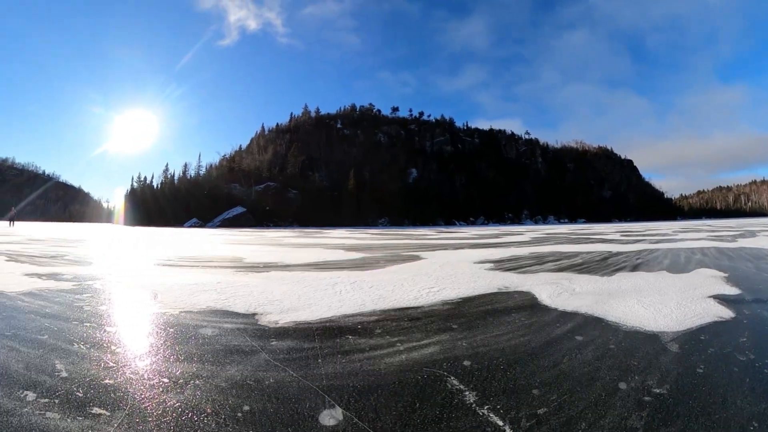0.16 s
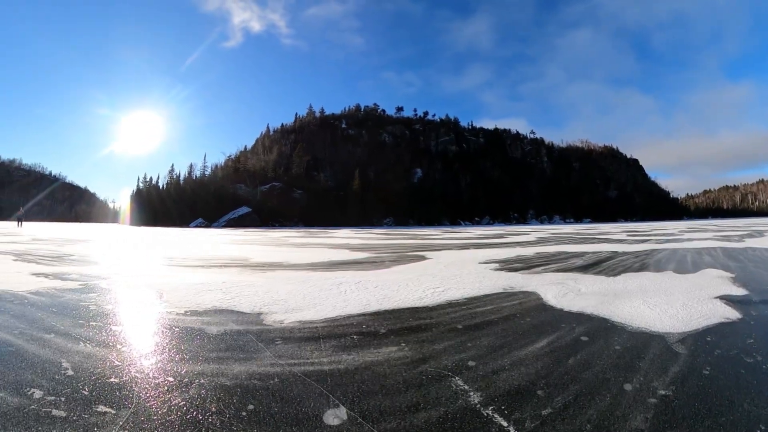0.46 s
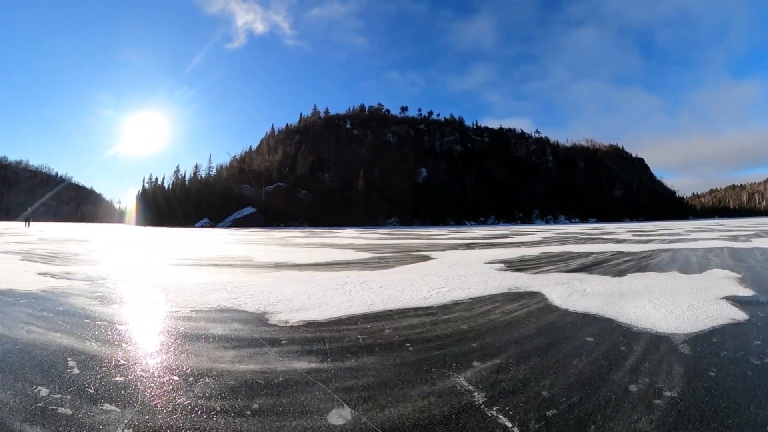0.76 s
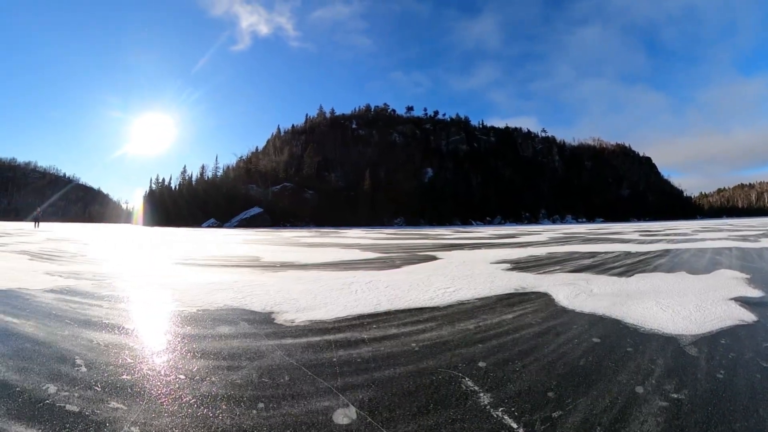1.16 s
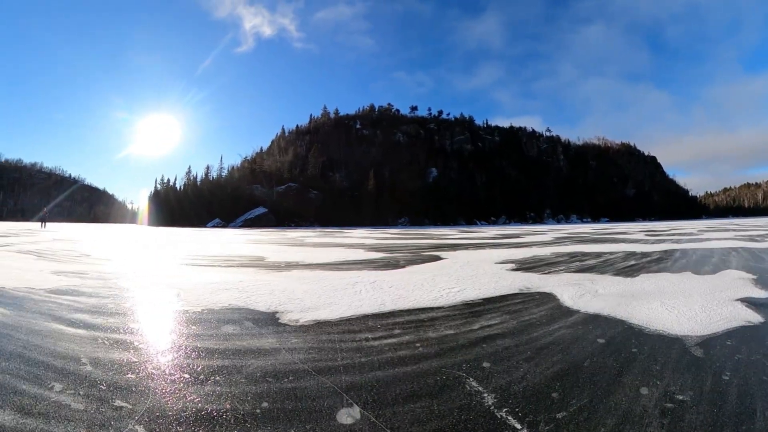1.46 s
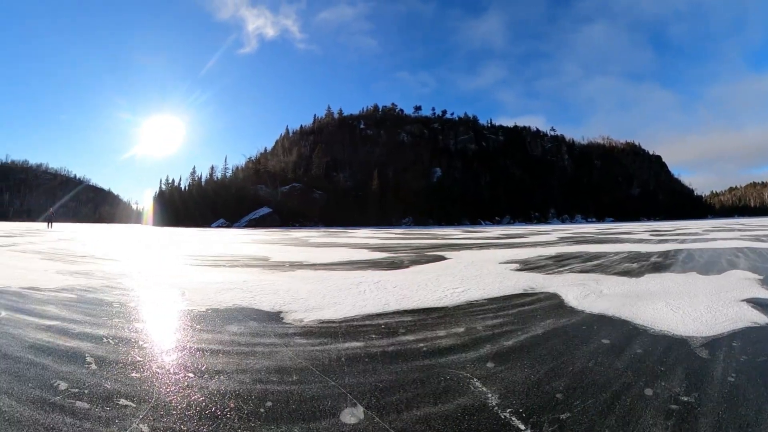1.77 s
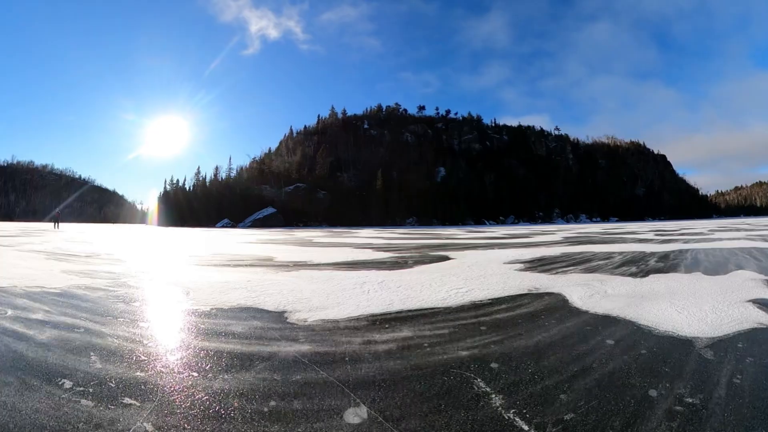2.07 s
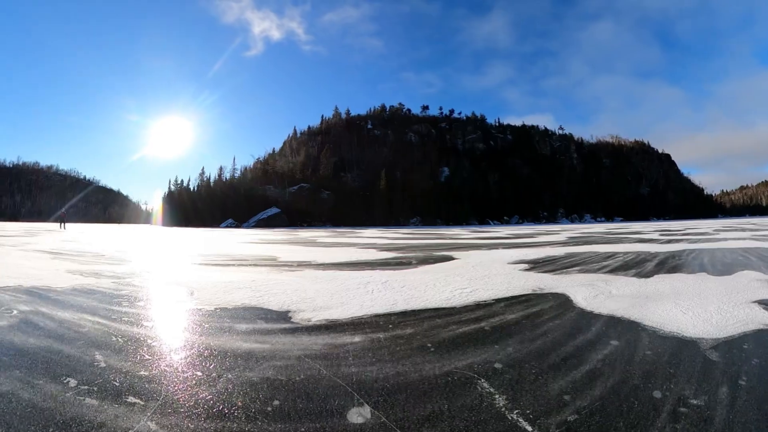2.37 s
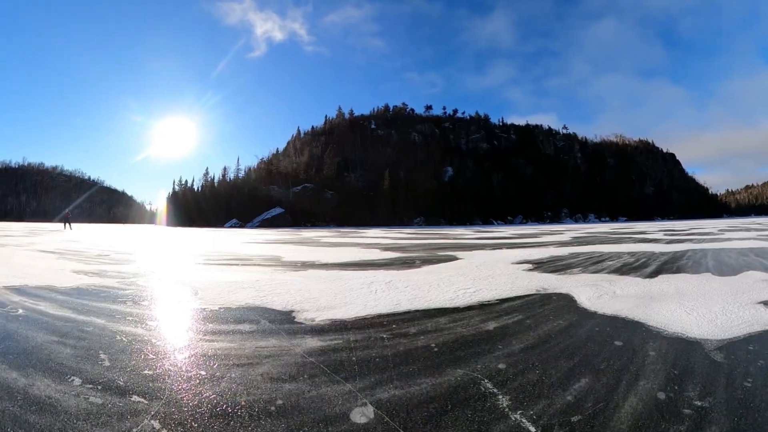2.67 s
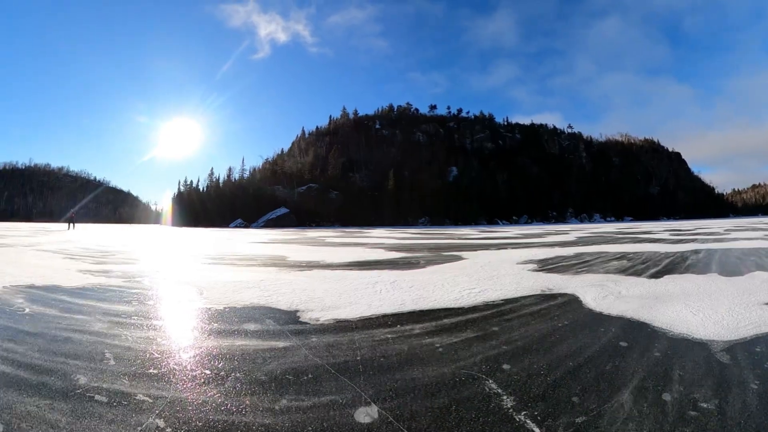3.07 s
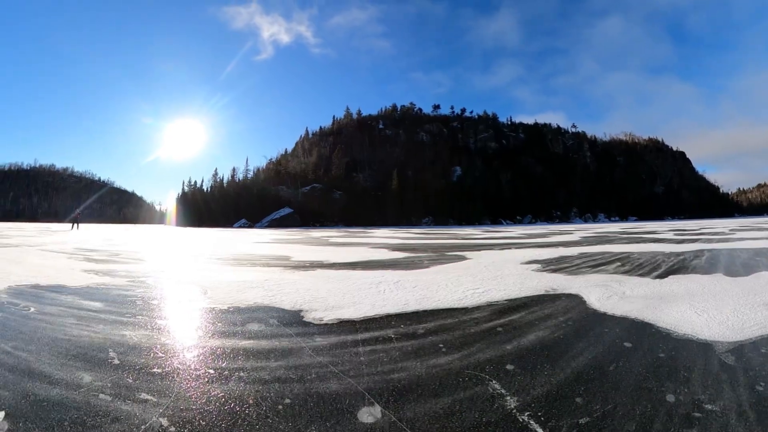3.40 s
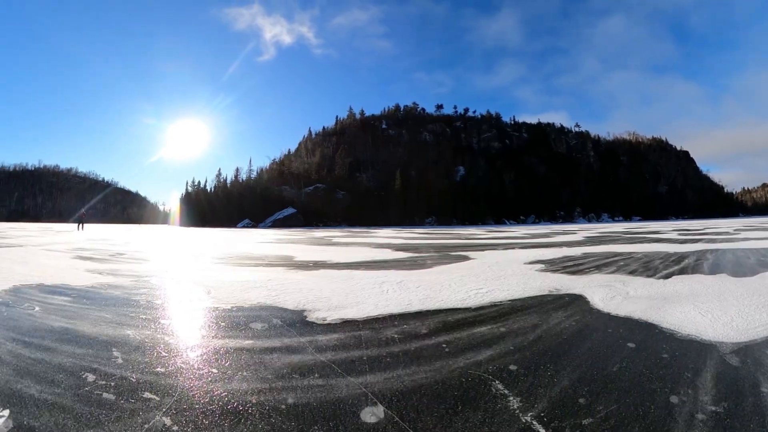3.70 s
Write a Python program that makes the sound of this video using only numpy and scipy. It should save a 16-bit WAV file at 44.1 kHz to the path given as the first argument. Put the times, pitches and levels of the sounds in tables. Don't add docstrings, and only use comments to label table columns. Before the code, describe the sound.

Wind buffeting a small exposed camera microphone on a frozen lake: continuous lumpy low rumble, dense crackling rips in the first two seconds, a thinner lull, then renewed gusts and snaps near the end.

```python
import sys
import numpy as np
from scipy import signal
from scipy.fft import rfft, irfft, next_fast_len
from scipy.io import wavfile
from scipy.ndimage import uniform_filter1d

SR = 44100
rng = np.random.default_rng(int(sys.argv[2]) if len(sys.argv) > 2 else 0)


def log_audio(samples):
    frames = np.atleast_2d(samples).T
    limited = np.clip(frames, -1, 1)
    pcm = np.round(limited * 32767).astype(np.int16)
    wavfile.write(sys.argv[1], SR, pcm)


def magnitude_from_level(level_db):
    exponent = np.asarray(level_db, float) / 20
    return 10 ** exponent


N = 169344

# start_s, level_db
PRESSURE = [(0, -26.5), (.2, -32.5), (0.369, -27), (.55, -23.5), (0.721, -28), (0.882, -35), (0.929, -30),
            (1.4, -24.5), (1.701, -27), (2.001, -28), (2.3, -36), (2.55, -30.5), (2.609, -30),
            (2.741, -35.5), (2.849, -29.5), (3.08, -35.5), (3.25, -26), (3.84, -30)]
# frequency_hz, density_db (per Hz)
RUMBLE_SPECTRUM = [(5.9, -34), (10, 5.5), (44, 2.5), (108, -1.5), (200, -20), (250, -31), (451, -46.5),
                   (1300, -64.5), (1690, -83.5), (2860, -120)]
# start_s, level_db
WIND_SPEED = [(0, -49.5), (.3, -54.5), (.47, -43), (.62, -48), (.76, -42.5), (.92, -53.5), (.97, -43),
              (1.36, -52.5), (1.43, -40), (1.5, -51), (1.88, -46), (2.08, -48), (2.12, -55.5),
              (2.66, -55.5), (3.05, -50.5), (3.37, -49), (3.52, -42), (3.84, -44)]
# frequency_hz, density_db (per Hz)
TEAR_SPECTRUM = [(1450, 5.5), (2000, -4), (3000, -18.5), (4200, -34), (6000, -50.5), (7800, -55.5),
                 (9500, -82)]
# centre_s, length_s, depth_db
LULLS = [(0.068, 0.034, -7), (0.178, 0.013, -21), (0.26, 0.013, -13), (0.383, 0.015, -19),
         (0.55, 0.017, -3.5), (1.183, 0.011, -19.5), (1.422, 0.006, -7), (1.453, 0.0095, -20),
         (1.529, 0.014, -14.5), (1.657, 0.01, -16), (1.712, 0.017, -13.5), (2.47, 0.072, -41),
         (2.749, 0.034, -15), (2.946, .02, -12.5), (3.163, .022, -15.5), (3.349, 0.022, -11),
         (3.592, 0.02, -9.5), (3.781, 0.0052, 0.5), (2.87, .008, -7.5)]
# frequency_hz, density_db (per Hz)
HISS_SPECTRUM = [(800, 1), (1500, -1), (4000, -1), (5500, -0.5), (7200, 2), (7800, -4), (8800, -20),
                 (12000, -20.5)]
# centre_s, peak_db, length_s, brightness_db (per octave)
WHIPS = [(0.0117, -34, 0.0015, -11.5), (0.112, -37, 0.0019, -15.5), (0.139, -41, 0.0014, -4),
         (0.298, -32, 0.0012, -9), (0.3092, -38, 0.0015, -0.5), (0.3398, -44, 0.0014, 7),
         (0.3488, -34.5, 0.004, -4.5), (0.4214, -47.5, 0.004, -20.5), (0.4545, -30, 0.0026, -1),
         (0.4656, -37, 0.0011, 12.5), (0.4848, -33, 0.0014, 10), (0.4896, -37.5, 0.0019, 12.5),
         (0.4978, -27, 0.002, 9), (0.531, -39, 0.0015, 0.5), (0.568, -25.5, 0.0015, 5),
         (0.577, -34.5, 0.0021, 2.5), (0.6464, -31, 0.0026, -10.5), (0.681, -27, 0.0015, -1.5),
         (0.7006, -38, 0.0016, -8), (0.7055, -26, 0.0012, -6), (0.732, -24.5, 0.0012, -2.5),
         (0.7496, -30.5, 0.0028, -2.5), (0.774, -36, 0.0019, -2), (0.783, -27, 0.0015, -4),
         (0.8117, -29, 0.0015, -3), (0.8601, -40.5, 0.002, -4.5), (0.8689, -39, 0.002, -6),
         (0.879, -34.5, 0.0012, 3.5), (0.899, -47.5, 0.0039, 5.5), (0.912, -42.0, 0.0013, -5),
         (0.9336, -43, 0.0021, -9), (0.9536, -28, 0.0013, 4), (0.9906, -31, 0.0015, 3.5),
         (1.024, -36.5, 0.0018, 2.5), (1.065, -40, 0.0026, 1), (1.1005, -33.5, 0.0025, -7),
         (1.1114, -39.5, 0.0019, -8), (1.155, -31.5, 0.0028, -3.5), (1.193, -35, 0.0019, -3.5),
         (1.208, -37, 0.0045, -2.5), (1.2538, -28.5, 0.0015, 1.5), (1.2905, -33.5, 0.0027, -15),
         (1.3071, -27.5, 0.0012, 2), (1.3157, -30.5, 0.002, 1), (1.336, -38, 0.0017, 2.5),
         (1.3498, -29, 0.0026, 2.5), (1.3755, -33.5, 0.0014, -10), (1.3932, -27.5, 0.002, 10),
              (1.407, -30.5, 0.0031, 14), (1.4642, -41, 0.0017, 11), (1.4832, -34.5, 0.0012, 10.5),
              (1.5, -38.5, 0.0016, -2.5), (1.5625, -39, 0.0026, 6), (1.5899, -32.5, 0.0018, 3.5),
              (1.609, -36.5, 0.0017, -1.5), (1.6283, -34.5, 0.0034, 5), (1.6454, -43.5, 0.0013, 5),
              (1.6834, -46, 0.0032, 0.5), (1.7363, -43.5, 0.0032, 4), (1.752, -52, 0.0036, -5.5),
              (1.77, -34.0, 0.002, 2), (1.8457, -37.5, 0.0047, -0.5), (1.873, -34.5, 0.0021, 7.5),
              (1.9292, -37.5, 0.002, 7.5), (1.9761, -44, 0.0026, 1.5), (2.012, -32.5, 0.0014, -0.5),
              (2.022, -45.5, 0.003, 14.5), (2.064, -34.5, 0.002, 0.5), (2.0772, -36, 0.003, 4.5),
              (2.3303, -37.5, 0.0016, -10.5), (2.3482, -39.5, 0.0014, -0.5), (2.639, -41.5, 0.0012, 1),
              (2.6504, -37.5, 0.0013, 6.5), (2.6727, -39, 0.0016, 0), (2.693, -39.5, 0.0013, -1),
              (2.8218, -35.5, 0.0015, -3.5), (2.8384, -42, 0.0013, 4), (2.9862, -35, 0.0018, 9),
              (3.1972, -41.5, 0.0018, -5), (3.408, -32.5, 0.0016, 8), (3.4723, -42.5, 0.0021, -4.5),
              (3.4995, -37.5, 0.0025, 5), (3.511, -38.5, 0.0024, 8.5), (3.5377, -26.5, 0.0012, 9),
              (3.5485, -36.5, 0.0024, 13), (3.6326, -40.5, 0.0016, 3.5), (3.6614, -29.5, 0.0019, -4),
              (3.7237, -35.5, 0.0022, -5), (3.743, -31.5, 0.0015, 15), (3.798, -25.5, 0.0012, 3.5)]
# centre_s, peak_db, length_s, swing_hz
SURGES = [(0.028, -18.5, 0.024, 30.3), (0.348, -24, 0.047, 44), (.51, -19.5, 0.026, 34.3),
          (0.601, -25, 0.023, 88), (.96, -26.5, 0.02, 68.2), (1.2, -26.5, .035, 68.5),
          (1.34, -23.5, 0.031, 108.7), (1.407, -22.5, .035, 56), (1.549, -24, 0.037, 64),
          (1.63, -26.5, 0.035, 99.6), (1.8, -20, 0.021, 46), (1.94, -26, 0.058, 55),
          (2.098, -29.5, 0.048, 89.3), (2.611, -24, 0.02, 98.2), (2.82, -25.5, 0.041, 57.8),
          (3.228, -23, 0.016, 94.4), (3.36, -26.5, 0.032, 117), (3.55, -25.5, 0.022, 100.4),
          (3.72, -27, 0.034, 33)]
# centre_s, peak_db, length_s, edge_db (per octave)
SHOVES = [(0.205, -33, 0.027, -12), (0.527, -28, 0.038, -2), (0.73, -27.5, 0.018, -4.5),
          (1.401, -27, 0.027, -8), (1.785, -26.5, 0.061, -6.5), (2.067, -28.5, 0.087, -6),
          (2.598, -24.5, 0.022, -6.5), (2.911, -29, 0.11, -9), (3.216, -25.5, 0.03, -3),
          (3.397, -26, 0.043, -2), (3.551, -24, 0.033, 0), (3.691, -25.5, 0.12, -3),
          (3.736, -24.5, 0.031, 0)]
# start_s, peak_db, pitch_hz, t60_s
KNOCKS = [
    (0.32, -49, 884, 0.025),
    (4.4, -56, 1070, .015),
    (4.1, -45, 9500, .012),
    (3.407, -45.5, 7800, .008),
]
# centre_s, peak_db, length_s, rate_hz, brightness_db (per octave)
BUZZ = (1.419, -39, .007, 686, -21)
# centre_s, length_s
LIFTS = [
    (1.428, 0.033),
    (3.76, 0.013),
]

CROSS_HZ, CROSS_WIDTH_HZ, LIFT_HZ = 1454.3, 7.8, 1630
PATCH_DB, PATCH_S = 2, 0.012


def evened(x):
    return x / np.sqrt(np.mean(x ** 2) + 1e-20)


def read(points, hz):
    f, value = np.transpose(points)
    return np.interp(np.log(hz + 1), np.log(f + 1), value)


def chance(t, seconds, bins=1, spread=1):
    width = max(seconds, 1e-4) / (t[1] - t[0])
    span = np.arange(-150, 151)
    bell = np.exp(-.5 * (span / width) ** 2)[:, None]
    z = signal.oaconvolve(rng.standard_normal((len(t), bins)), bell, "same", 0)
    z = z - uniform_filter1d(z, size=int(10 * width) + 3, axis=0)
    return evened(uniform_filter1d(z, size=spread, axis=1))


def bump(t, s, length, order=2):
    return np.exp(-.5 * abs((t - s) / max(length, 3e-4)) ** order)[:, None]


def grid(size):
    return np.arange(4 * N // size + 5) * size / 4 / SR, np.fft.rfftfreq(size, 1 / SR)


def noise(field, size):
    z = rng.standard_normal(field.shape + (2,)) @ [1, 1j]
    return signal.istft((z * field).T, nperseg=size, noverlap=size * 3 // 4)[1][:N]


def rumble_colour(hz):
    return magnitude_from_level(read(RUMBLE_SPECTRUM, hz)) * (hz < 1400)


def steadied(x, lo_hz, hi_hz):
    hz = np.fft.rfftfreq(N, 1 / SR)
    band_gain = 1 / (1 + (hz / hi_hz) ** 4) - 1 / (1 + (hz / lo_hz) ** 4)
    band = irfft(rfft(x) * band_gain, N)
    power = np.var(band)
    swell = uniform_filter1d(band ** 2, size=3000) + 0.023 * power
    return band * (power / swell) ** (0.78 / 2)


def rumble():
    t, hz = grid(size=1024)
    field = magnitude_from_level(PATCH_DB * chance(t, PATCH_S, bins=len(hz), spread=5))
    colour = rumble_colour(np.fft.rfftfreq(N, 1 / SR))
    raw = evened(irfft(rfft(noise(field, size=1024)) * colour, N))
    low = steadied(raw, 1e-3, 70) + steadied(raw, 70, 170)
    skirt = steadied(raw, 170, 330) + steadied(raw, 330, 1e5)
    level = np.interp(np.arange(N) / SR, *np.transpose(PRESSURE))
    skirt_level = level.mean() + 0.12 * (level - level.mean())
    return low * magnitude_from_level(level - 1) + skirt * magnitude_from_level(skirt_level)


def tearing(t, hz, octaves):
    speed = np.interp(t, *np.transpose(WIND_SPEED))[:, None]
    speed = speed + sum(db * bump(t, s, length, order=6) for s, length, db in LULLS)
    flurry = 2.01 * chance(t, 0.0094)
    swing = 3 * chance(t, 0.0019) + flurry
    brightening = 0.45 * octaves * (swing + speed + 50)
    ragged = chance(t, 0.0024, bins=len(hz), spread=2)
    power = magnitude_from_level(speed - 2 + swing + brightening - ragged) ** 2
    return power, (speed + flurry)[:, 0]


def snap(octaves, bright_db):
    return np.fft.fftshift(irfft(magnitude_from_level(bright_db * octaves)))


def strays(t, wind_db, octaves):
    per_s, level_db, spread_db, bright_db = 150, 7, 1.5, 1
    draw = rng.random((N, 3))
    hits = (draw[:, 0] < per_s / SR) * np.sign(draw[:, 1] - .5)
    extra_db = level_db - spread_db * np.log(np.maximum(draw[:, 2], .03))
    hits = hits * magnitude_from_level(np.interp(np.arange(N) / SR, t, wind_db) + extra_db)
    return np.convolve(hits, snap(octaves, bright_db), "same")


def whips(t, octaves):
    power, snaps = 0, np.zeros(N)
    for s, db, length, bright_db in WHIPS:
        bright_db = bright_db - 1
        power = power + bump(t, s, length) ** 2 * magnitude_from_level(db - 3.5 + bright_db * octaves) ** 2
        at = round(s * SR) - 32
        snaps[at:at + 64] += magnitude_from_level(db + 13) * snap(octaves, bright_db)
    return power, snaps


def exposed():
    t, hz = grid(size=64)
    octaves = np.log2(np.clip(hz, 1400, 4600) / 1500)
    tear_power, wind_db = tearing(t, hz, octaves)
    stray_snaps = strays(t, wind_db, octaves)
    whip_power, whip_snaps = whips(t, octaves)
    field = np.sqrt((tear_power + whip_power) / len(hz))
    return noise(field, size=64) + stray_snaps + whip_snaps


def hiss():
    t, hz = grid(size=1024)
    field = magnitude_from_level(read(HISS_SPECTRUM, hz)) * (hz > 800) * np.ones((len(t), 1))
    return magnitude_from_level(-72.5) * evened(noise(field, size=1024))


def surges():
    t, out = np.arange(N) / SR, np.zeros(N)
    for s, db, length, hz in SURGES:
        since = t - s
        cycles = hz * since * (1 - 1.5 * since) + rng.random()
        out += magnitude_from_level(db) * bump(t, s, length)[:, 0] * np.cos(2 * np.pi * cycles)
    return out


def shoves():
    t, hz = grid(size=512)
    octaves = np.log2(np.clip(hz, 100, 500) / 200)
    power = sum(bump(t, s, length) * magnitude_from_level(db - 7 + (edge_db + 2.5) * octaves) ** 2
                for s, db, length, edge_db in SHOVES)
    bursts = noise(np.sqrt(power) * magnitude_from_level(PATCH_DB * chance(t, PATCH_S / 2)), size=512)
    fine = np.fft.rfftfreq(N, 1 / SR)
    reach = rumble_colour(fine) / magnitude_from_level(read(RUMBLE_SPECTRUM, 183.4))
    reach = reach / (1 + (185 / (fine + 1)) ** 4) / (1 + (fine / 800) ** 2)
    return irfft(rfft(bursts) * reach, N)


def knocks():
    out, t = np.zeros(N + SR), np.arange(4000) / SR
    for s, db, hz, t60 in KNOCKS:
        at = round(s * SR)
        attack = np.minimum(t / 0.002, 1)
        out[at:at + len(t)] += attack * magnitude_from_level(db - 60 * t / t60) * np.sin(2 * np.pi * hz * t)
    return out[:N]


def buzz():
    s, db, length, hz, bright_db = BUZZ
    t = np.arange(N) / SR
    tones = sum(magnitude_from_level(bright_db * np.log2(k / 3)) * np.cos(2 * np.pi * k * hz * (t - s))
                for k in range(3, 8))
    return magnitude_from_level(db) * bump(t, s, length)[:, 0] * tones


def crossed_over(x):
    size = next_fast_len(N + 8192)
    hz = np.fft.rfftfreq(size, 1 / SR)
    edge = 1 + np.exp(-np.clip((hz - CROSS_HZ) / CROSS_WIDTH_HZ, -50, 50))
    torn = rfft(x, size) * evened(magnitude_from_level(read(TEAR_SPECTRUM, hz)) / edge)
    below_lift = torn / (1 + np.exp(np.clip((hz - LIFT_HZ) / 40, -50, 50)))
    lost = irfft(below_lift, size)[:N]
    lifted = sum(bump(np.arange(N) / SR, s, length, order=4)[:, 0] for s, length in LIFTS)
    return irfft(torn, size)[:N] - lifted * lost


def scene():
    sheltered = rumble() + surges() + shoves()
    return (sheltered + crossed_over(exposed()) + hiss() + knocks() + buzz())[None]


def top_cut(x):
    return signal.sosfilt(signal.butter(12, 11500, fs=SR, output="sos"), x)


def record(dry):
    t = np.arange(N) / SR
    mix = dry * np.minimum(.3 + np.minimum(t, t[::-1]) / .006, 1) + .0014
    return top_cut(mix)


dry = scene()
out = record(dry)
log_audio(out)
```